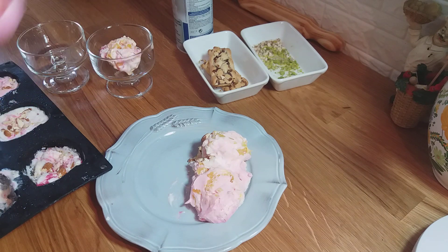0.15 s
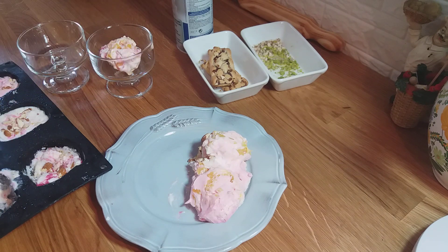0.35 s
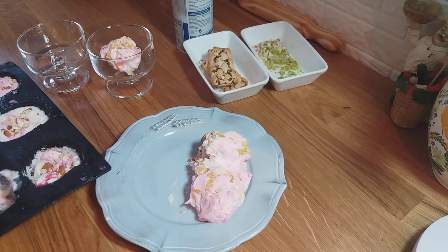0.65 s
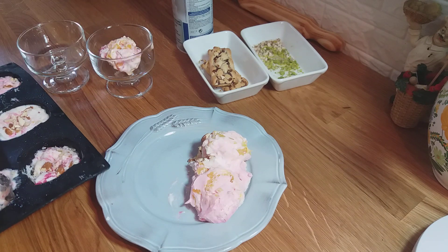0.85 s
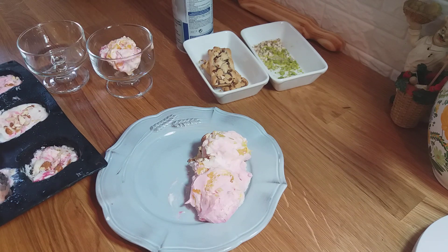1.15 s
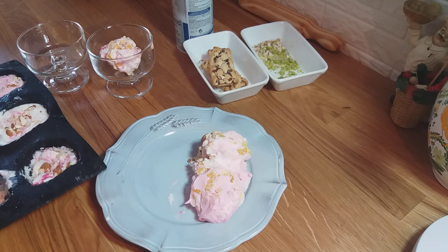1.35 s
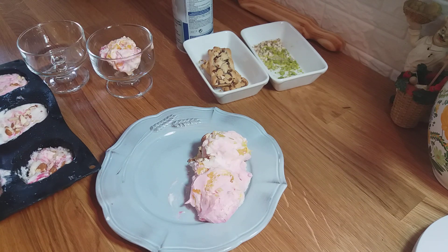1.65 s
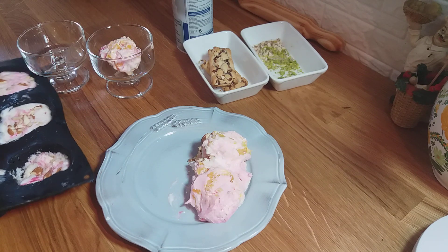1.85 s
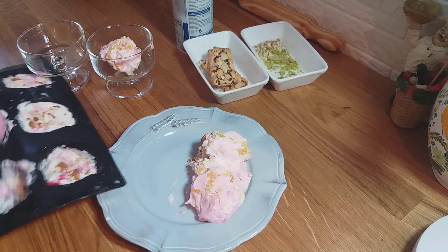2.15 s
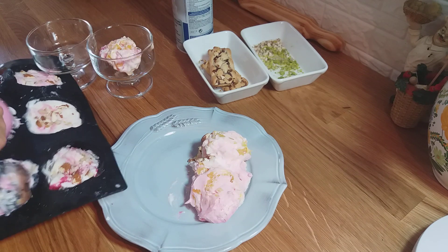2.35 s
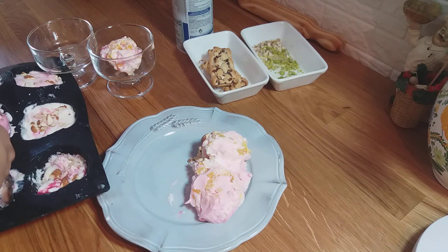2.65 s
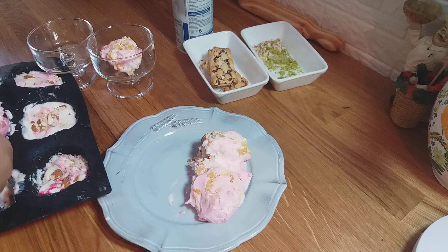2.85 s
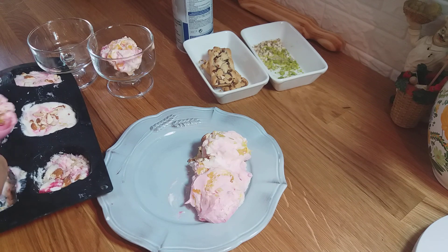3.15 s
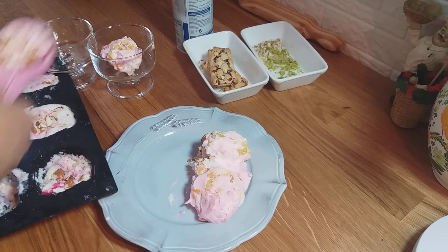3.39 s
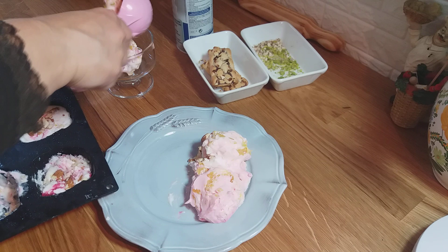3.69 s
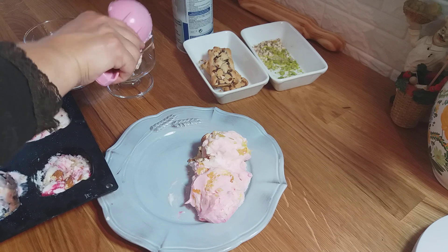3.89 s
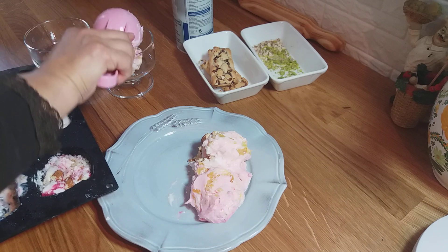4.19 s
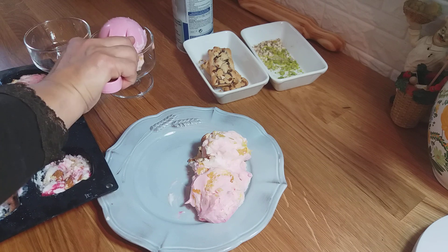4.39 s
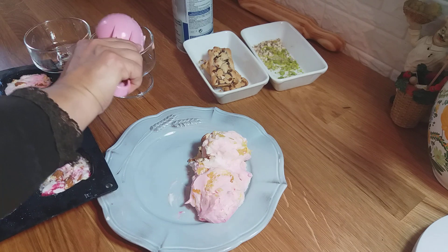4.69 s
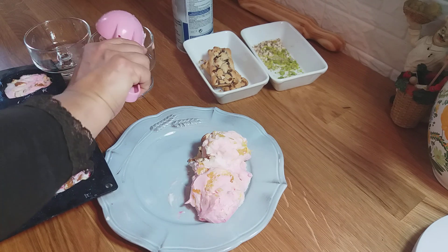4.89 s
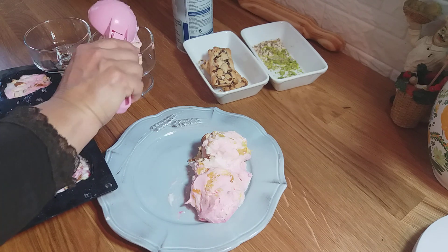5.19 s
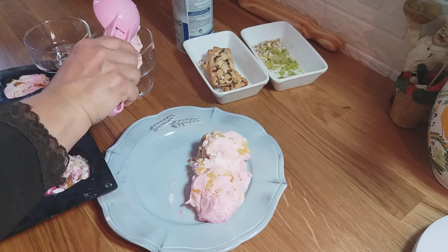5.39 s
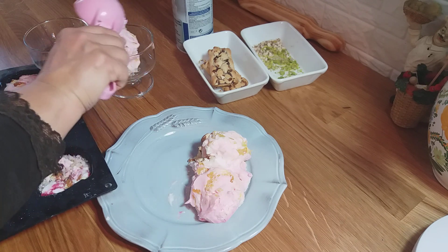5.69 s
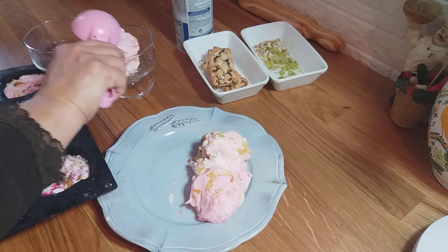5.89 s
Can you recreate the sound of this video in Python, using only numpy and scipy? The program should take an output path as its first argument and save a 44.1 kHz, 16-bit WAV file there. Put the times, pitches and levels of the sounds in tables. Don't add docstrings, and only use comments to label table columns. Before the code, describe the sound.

Crisp plastic clicks and hollow knocks, a short juddering slide ending in a bright glass clash, then a soft tap in a quietly humming kitchen.

```python
import sys
import numpy as np
from scipy import signal
from scipy.fft import rfft, irfft
from scipy.io import wavfile
from scipy.ndimage import uniform_filter1d, map_coordinates

SR = 44100
rng = np.random.default_rng(int(sys.argv[2]) if len(sys.argv) > 2 else 0)


def master_out(mix):
    frames = np.transpose(np.atleast_2d(mix))
    ceiling = np.clip(frames, -1, 1)
    pcm = np.round(ceiling * 32767).astype(np.int16)
    wavfile.write(sys.argv[1], SR, pcm)


def undo_db(level):
    steps = np.asarray(level, float) / 20
    return 10 ** steps


N = 266364

CLASH_S, CLASH_DB = 2.4178, -17.5
GAP_S = 0.0048


def along(points, hz):
    f, v = np.transpose(points)
    return np.interp(np.log(hz + 1), np.log(f + 1), v)


def unit(x):
    return x / np.sqrt(np.mean(x ** 2) + 1e-20)


def wobble(rate):
    points = rng.standard_normal(int(N * rate / SR) + 4)
    return map_coordinates(points, [np.arange(N) * rate / SR])


def coloured(x, points):
    size = 2 ** 13
    colour = undo_db(along(points, np.fft.rfftfreq(size, 1 / SR)))
    cepstrum = irfft(np.log(colour + 1e-6))
    half = size // 2
    cepstrum = np.r_[cepstrum[0], 2 * cepstrum[1:half], np.zeros(half)]
    kernel = irfft(np.exp(rfft(cepstrum)))
    return signal.fftconvolve(x, kernel / np.linalg.norm(kernel))[:len(x)]


def resonant(x, hz, width_hz):
    hz = min(hz, SR / 2.2)
    return signal.lfilter(*signal.iirpeak(hz, hz / width_hz, SR), x)


def twice_resonant(x, hz, width_hz):
    return resonant(resonant(x, hz, width_hz), hz, width_hz)


def burst(t60, after_db=-60, after_t60=0.06, spike=3, rise=0.00001):
    t = np.arange(SR // 10) / SR
    noise = rng.standard_normal(len(t))
    noise[0] = spike
    fade = undo_db(-60 * t / t60) + undo_db(after_db - 60 * t / after_t60)
    fade = fade * (1 - np.exp(-(t + 1 / SR) / rise))
    z = rfft(noise * fade)
    flat = z / np.sqrt(uniform_filter1d(abs(z) ** 2, size=40))
    ending = np.hanning(2 * len(t))[len(t):]
    return irfft(flat, len(t)) * np.linalg.norm(fade) * ending


def ring(modes, scatter_db):
    t = np.arange(SR // 2) / SR
    out = np.zeros(len(t))
    for hz, db, t60 in modes:
        strength_db = db + scatter_db * rng.standard_normal()
        out += undo_db(strength_db - 60 * t / t60) * np.sin(2 * np.pi * hz * t)
    return out * (1 - np.exp(-t / 0.0003))


def add(track, s, sound):
    part = track[round(s * SR):][:len(sound)]
    part += sound[:len(part)]


def fridge():
    compressor = {2: -79.5, 3: -73.5, 4: -67, 5: -64.5, 6: -77, 7: -73.5, 8: -77.5, 9: -78, 10: -88, 12:
                  -77, 13: -84, 14: -78.5, 15: -89, 39: -87.5, 40: -87.5, 41: -94, 42: -82.5, 43: -86.5, 73:
                  -82.5}
    fan = {2: -78, 4: -84.5, 6: -63, 7: -80.5, 8: -75.5, 9: -81, 10: -77.5, 44: -83.5, 45: -85.5, 46: -88.5,
           50: -85, 52: -93, 54: -91, 77: -93}
    # (pitch [Hz], width [Hz], level [dB rms])
    panels = [(99.94, 14, -79.5), (128, 9.7, -80), (165.2, 8, -78), (297, 12, -77), (357.9, 10, -68.5),
              (493, 8, -79), (506, 6, -78), (643, 14, -80.5)]
    compressor_hz, fan_hz = 48.16, 49.05
    tones = [(100, -76)]
    tones += [(k * compressor_hz, db) for k, db in compressor.items()]
    tones += [(k * fan_hz, db) for k, db in fan.items()]
    t = np.arange(N) / SR
    drift_db = 0.6 * wobble(1.5)
    out = np.zeros(N)
    for hz, db in tones:
        out += np.sqrt(2) * undo_db(db + drift_db) * np.sin(2 * np.pi * (hz * t + rng.random()))
    noise = rng.standard_normal(N)
    for hz, width_hz, db in panels:
        out += undo_db(db) * unit(twice_resonant(noise, hz, width_hz))
    return out


def air():
    # (pitch [Hz], level [dB per Hz])
    air_colour = [(20, -46.5), (45, -14), (100, -13.5), (300, -9), (700, -14.5), (1030, -18), (2100, -21.5),
                  (3500, -24.5), (5000, -30), (6800, -35.5), (8300, -29), (11000, -31.5), (15700, -28.5),
                  (16100, -55.5)]
    return undo_db(-65 + 0.44 * wobble(1.6)) * coloured(rng.standard_normal(N), air_colour)


def street():
    # (time [s], peak level [dB], half-length [s])
    passes = [
        (.82, -82, .12),
        (1.45, -73.5, .25),
        (2.1, -84, .4),
        (4.332, -74.5, .22),
        (4.85, -80, .3),
        (5.93, -77, .2),
    ]
    t = np.arange(N) / SR
    swell = undo_db(-89)
    for s, db, half_s in passes:
        swell = swell + undo_db(db) / (1 + ((t - s) / half_s) ** 2)
    return swell * unit(twice_resonant(rng.standard_normal(N), 57, 32))


def frost():
    # (time [s], peak level [dB], centre pitch [Hz])
    ticks = [(0.144, -44.5, 9600), (.1447, -41.5, 4600), (0.251, -48, 9800), (.254, -38, 3100),
             (1.351, -48, 11000), (1.447, -46, 7500), (1.521, -47.5, 11000), (1.531, -46, 6500),
             (1.5535, -48, 10500), (1.5538, -40, 4320), (1.585, -48, 12000), (1.598, -46.5, 12500),
             (1.6475, -44, 8900), (2.115, -34.5, 9500), (2.1152, -38, 6200), (2.129, -39, 9100),
             (2.139, -39, 10540), (2.152, -33, 5340), (2.194, -50.5, 8500), (2.236, -53, 9100),
             (2.354, -50, 6540), (2.401, -38.5, 9400), (2.725, -57, 12000), (2.749, -51, 8600),
             (2.795, -60, 12800), (3.0583, -41.5, 10940), (3.070, -49, 13500), (3.087, -43, 9500),
             (5.7235, -54, 9930)]
    # (pitch [Hz], level [dB])
    tick_colour = [(4500, 0.5), (6900, -2.5), (8400, -0.5)]
    out = np.zeros(N)
    for s, db, hz in ticks:
        width_hz = 0.4 * hz * (hz / 5000) ** 0.6
        tick = burst(0.008, after_db=-18, after_t60=0.04)
        add(out, s, undo_db(db) * twice_resonant(tick, hz, width_hz))
    out = coloured(out, tick_colour)
    ping = ring([(3050, -60, 0.14)], scatter_db=5.5)
    add(out, 0.254, ping)
    return out


def ratchet():
    # (time [s], peak level [dB], rattle afterwards [dB])
    teeth = [(0.39, -20, -34), (0.7701, -17, -17), (0.7917, -32, -2), (0.8201, -12.5, -16.5),
             (.840, -16.5, -9.5), (0.854, -21, -15), (0.8658, -16, -11), (0.8777, -10, -29),
             (0.8813, -21.5, -13), (0.8895, -19.5, -8), (0.893, -21, -3), (0.8999, -17, -5),
             (0.933, -12, -5.5), (0.9379, -15, -29), (0.9655, -10, -16), (0.9768, -8.5, -16.5),
             (4.8105, -26, -1.5), (4.8188, -11, -13.5), (4.8353, -16.5, 1)]
    # (pitch [Hz], level [dB per Hz])
    shell_aside = [(1500, -24), (2100, -11), (2700, -15), (3600, 4), (4200, -15), (4900, -4.5), (6800, -25),
                   (8800, 3.5), (11000, -10), (15200, -10), (16500, -20)]
    # (pitch [Hz], level [dB per Hz])
    shell_at_work = [(410, -47), (700, -23), (728, -25.5), (1110, -14), (1290, -26), (1890, -6.5),
                     (2880, -15.5), (3560, -7), (5580, -9), (6120, -2.5), (6800, -19), (8410, -0.5),
                     (11100, -8.5), (15400, -8), (16500, -30)]
    # (pitch [Hz], level [dB per Hz])
    shell_over_cups = [(410, -57), (700, -17.5), (1110, -18), (1300, -25), (1470, -15.5), (1700, -10.5),
                       (2360, -10), (3000, -20), (4230, -5.5), (7170, -12.5), (8860, 1.5), (10700, -10),
                       (11500, -5), (15200, -7.5), (16500, -22)]
    out = np.zeros(N)
    for s, db, rattle_db in teeth:
        shell = shell_aside if s < 0.5 else shell_at_work if s < 3 else shell_over_cups
        rise = 0.00002 if s < 3 else 0.0004
        t60 = 0.019 * 2 ** (rattle_db / 29.5)
        snap = burst(t60, rattle_db, after_t60=0.026, spike=8.5, rise=rise)
        crack = coloured(snap, shell)
        body = signal.lfilter(*signal.butter(2, 6500, fs=SR), crack)
        body_db = 0.82 * max(-28.5 - db, 0)
        add(out, s + 0.00088, undo_db(db - 9.5) * (crack + (undo_db(body_db) - 1) * body))
    return out


def nudge():
    push_s, half_s = 0.794, 0.1
    swell = np.exp(-((np.arange(N) / SR - push_s) / half_s) ** 2 / 2)
    return undo_db(-60) * swell * unit(twice_resonant(rng.standard_normal(N), 377, 64))


def knocks():
    # (time [s], peak level [dB], high over low panels [dB], contact cut-off [Hz], crack [dB])
    hits = [(1.12, -42, -3, 2500, -34), (1.179, -47.5, 3, 3400, -29), (1.3555, -19.5, 11.5, 2260, 2),
            (1.3676, -14.5, 0.5, 6500, -7), (1.3756, -32, -9, 2600, -24), (1.445, -35, -2, 2300, -25),
            (1.6465, -37.5, -4, 1300, -16), (1.6723, -32.5, -4.5, 3140, -9), (2.2008, -25, -1.5, 2095, -17),
            (2.411, -35, -9.5, 2500, -19.5), (2.7655, -33, 0.5, 2800, -6), (5.816, -61, 24, 2800, -26)]
    # (pitch [Hz], width [Hz], level [dB])
    low_panels, high_panels = [
        [(475, 300, -7), (767.3, 250, -1.5), (930, 167, 5.5), (1242, 170, 2)],
        [(1454, 210, 3), (1750, 242, 1.5), (2328, 410, -6), (3100, 800, -8), (4100, 900, -8.5)],
    ]
    # (pitch [Hz], level [dB per Hz])
    crack_colour = [(2000, -31.5), (4000, -9.5), (5600, -0.5), (7000, -7.5), (8500, 0.5), (10000, -3.5),
                    (11500, -3.5), (13500, -12), (16500, -19.5)]
    no_bass = signal.butter(2, 400, "high", fs=SR)
    out = np.zeros(N)
    for s, db, tilt_db, contact_hz, crack_db in hits:
        push = burst(0.00061, after_db=-32.5, after_t60=0.055, spike=2.2)
        push = signal.lfilter(*signal.butter(3, contact_hz, fs=SR), push)
        modes = [(hz, width_hz, db_own - tilt_db / 2) for hz, width_hz, db_own in low_panels]
        modes += [(hz, width_hz, db_own + tilt_db / 2) for hz, width_hz, db_own in high_panels]
        body = np.zeros(len(push))
        for k, (hz, width_hz, gain_db) in enumerate(modes):
            body += (-1) ** k * undo_db(gain_db) * resonant(push, hz, width_hz)
        body = signal.lfilter(*no_bass, body)
        crack = coloured(burst(0.008, after_db=-14, after_t60=0.027), crack_colour)
        add(out, s, undo_db(db + 20) * body + undo_db(db + crack_db - 11.5) * crack)
    return out


def slide():
    # (time [s], speed [0-1])
    motion = [
        (2.262, 0.02),
        (2.3, 0.36),
        (2.35, 0.97),
        (2.385, 0.81),
        (2.405, .95),
        (2.418, 1),
    ]
    # (pitch [Hz], level [dB per Hz])
    table_colour = [(71, -44.5), (120, -16), (216, -13.5), (327, -8.5), (380, -2), (647, -20.5),
                    (720, -10.5), (1000, -21), (1300, -50), (2200, -120)]
    # (pitch [Hz], level [dB per Hz])
    grain_colour = [(530, -30.5), (900, -3), (1520, -5), (1710, -17), (2450, -4.5), (2730, -17.5),
                    (4440, -20.5), (6000, -30), (7800, -63), (13200, -120)]
    speed = np.interp(np.arange(N) / SR, *np.transpose(motion), 0, 0)
    judder = undo_db(5.8 * wobble(80))
    rumble = coloured(rng.standard_normal(N) * judder, table_colour)
    scrape = coloured(rng.standard_normal(N) * judder, grain_colour)
    squeak = unit(twice_resonant(rng.standard_normal(N), 8550, 200))
    squeak = squeak + 0.6 * unit(twice_resonant(rng.standard_normal(N), 4420, 120))
    groan_hz = 324 + 117.6 * speed + 25 * wobble(60)
    groan = judder * np.sin(2 * np.pi * np.cumsum(groan_hz) / SR)
    # (sound, dB at full speed, how steeply it grows with speed)
    layers = [(rumble, -44.5, 1.6), (scrape, -56.5, 0.9), (squeak, -68, 1.2), (groan, -49.5, 1.6)]
    return sum(undo_db(db) * speed ** power * unit(x) for x, db, power in layers)


def clash():
    # (pitch [Hz], level [dB], t60 [s])
    cups = [(3612, -13.5, 0.292), (4890, 0.5, 0.12), (5416, -5.5, 0.1796), (7130, -11, 0.56),
            (7614, -5.5, 0.26), (7837, -9, 0.26), (7800, -8, 0.22), (8113, -7.5, 0.27), (8549, -14.5, 0.3),
            (9808, -11.5, 0.42), (10340, -4.5, 0.26), (10870, -27, 1.9), (12500, -15, 0.2),
            (14440, -5, 0.1694)]
    # (pitch [Hz], level [dB per Hz])
    bowl_colour = [(900, -33), (1500, -17), (1900, 0), (2450, -7.5), (2850, -10), (3600, -7), (4600, -12.5),
                   (4950, -3), (5900, -4.5), (6500, -23.5), (7250, 1), (8200, -1), (9000, -16),
                   (11000, -44.5)]
    # (pitch [Hz], level [dB per Hz])
    rim_colour = [(5290, -41.5), (9000, -26.5), (9490, -6.5), (9960, 1.5), (10700, -5), (11400, -15.5),
                  (12000, -26.5), (12450, -7), (12900, -16), (13600, -2), (14000, -17.5), (14500, -22),
                  (16000, -38.5)]
    # (pitch [Hz], level [dB per Hz])
    thump_colour = [(50, -50.5), (100, -21), (170, -7), (300, -7), (490, -1), (620, -8), (730, -5),
                    (1050, -8.5), (1450, -23), (2000, -45.5)]
    damped = [(hz, db, min(t60, 0.4) * 0.61) for hz, db, t60 in cups]
    after = GAP_S * np.arange(8)
    blow_db = CLASH_DB - 430 * (after - GAP_S)
    blow_db[0] = CLASH_DB - 3.5
    out = np.zeros(N)
    for s, db in zip(CLASH_S + after, blow_db):
        add(out, s, undo_db(db - 16) * ring(damped, scatter_db=2))
        add(out, s, undo_db(db - 6.5) * coloured(burst(0.1, spike=0.93), bowl_colour))
        add(out, s, undo_db(db - 5.5) * coloured(burst(0.077, spike=1), rim_colour))
        add(out, s, undo_db(db - 11.5) * coloured(burst(0.09, spike=0.68), thump_colour))
    return out


def stand():
    # (pitch [Hz], level [dB], t60 [s])
    stems = [(494.2, 0, 0.27), (551, -4, 0.12), (738, -3, .21), (696, -5.5, .2), (1060, -6, 0.055),
             (1989, -1.5, 0.075)]
    out = np.zeros(N)
    add(out, CLASH_S + GAP_S, undo_db(CLASH_DB - 10) * ring(stems, scatter_db=0.5))
    return out


def tap():
    # (time [s], thud [dB], clink [dB])
    touches = [
        (4.5767, -38.5, -45.5),
        (4.5847, -40, -67),
    ]
    # (pitch [Hz], level [dB], t60 [s])
    foot = [(195, -11, 0.059), (337, -10, 0.015), (470, 0, 0.02), (630, -4.5, 0.0086), (840, -11.5, 0.011)]
    # (pitch [Hz], level [dB], t60 [s])
    rim = [(1890, 4, 0.0084), (2260, 3, 0.013), (3280, -1.5, 0.017), (4200, -3.5, 0.013), (4926, -17, 0.2)]
    out = np.zeros(N)
    for s, thud_db, clink_db in touches:
        thud = signal.lfilter(*signal.butter(2, 700, fs=SR), ring(foot, scatter_db=4.5))
        add(out, s, undo_db(clink_db) * ring(rim, scatter_db=0.5))
        add(out, s + 0.002, -undo_db(thud_db) * thud)
    return out


def sleeve():
    t = np.arange(N) / SR
    cloth = unit(resonant(rng.standard_normal(N) * undo_db(2.5 * wobble(30)), 4500, 7000))
    nearest_s = 4.8
    brush_db = -81 - np.maximum(50 * (nearest_s - t), 42 * (t - nearest_s))
    return undo_db(brush_db) * cloth


def kitchen(x):
    # (pitch [Hz], t60 [s])
    decay = [(200, 0.51), (530, 0.34), (1400, 0.42), (3700, 0.4), (9700, 0.31), (16000, 0.24)]
    out = np.zeros(N)
    step = SR // 10
    for i in range(0, N, step):
        hz, t, z = signal.stft(rng.standard_normal(SR // 2), SR, nperseg=256)
        late = undo_db(-60 * t / along(decay, hz)[:, None])
        early = undo_db(4.5 - 60 * t / 0.015)
        tail = signal.istft(z * (late + early), SR, nperseg=256)[1]
        piece = x[i:i + 2 * step]
        piece = piece * np.sqrt(np.hanning(2 * step))[:len(piece)]
        add(out, i / SR + 0.003, signal.fftconvolve(piece, tail / np.linalg.norm(tail)))
    return out


def scene():
    # (source, level sent to the room in dB)
    contacts = [(frost(), -6), (ratchet(), -3), (nudge(), -12), (knocks(), -2.5),
                (slide(), -6), (clash(), -3), (stand(), -11), (tap(), -9)]
    near = sum(x for x, db in contacts)
    room = kitchen(sum(undo_db(db) * x for x, db in contacts))
    background = fridge() + air() + street() + sleeve()
    return (near + room + background)[None]


def low_pass(x):
    return signal.sosfilt(signal.butter(12, 16990, fs=SR, output="sos"), x)


def record(dry):
    # (pitch [Hz], level [dB])
    mic = [(25, -18.5), (60, 1), (15800, 0), (16300, -13.5), (17000, -48)]
    heard = irfft(rfft(dry) * undo_db(along(mic, np.fft.rfftfreq(N, 1 / SR))), N)
    return low_pass(heard - 0.0005)


dry = scene()
out = record(dry)
master_out(out)
```